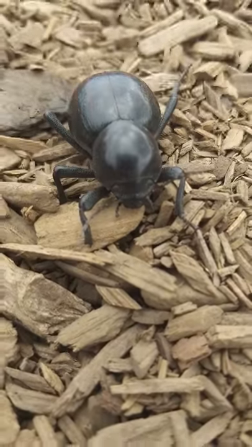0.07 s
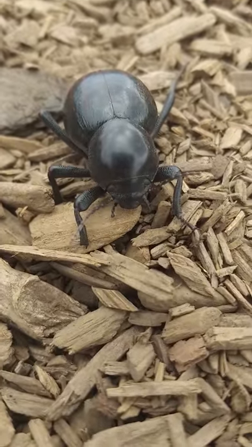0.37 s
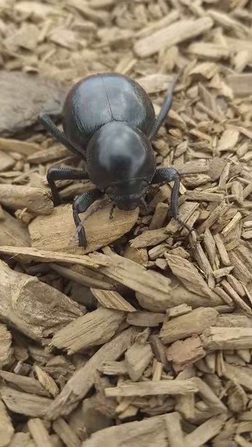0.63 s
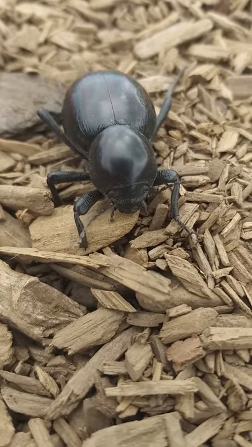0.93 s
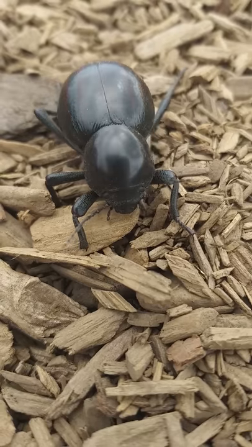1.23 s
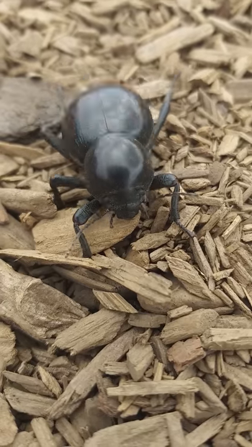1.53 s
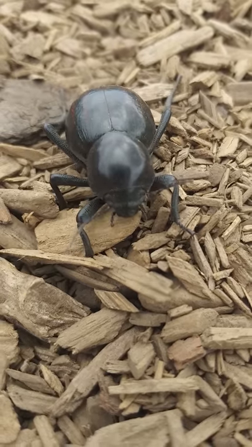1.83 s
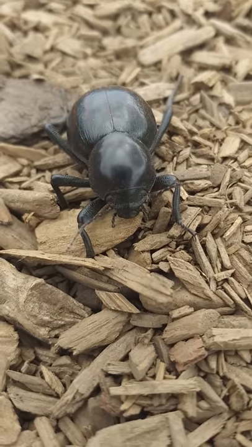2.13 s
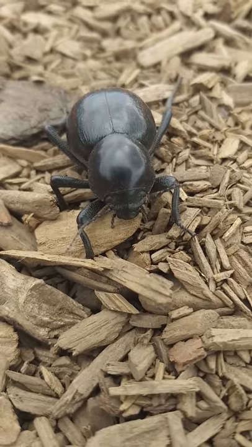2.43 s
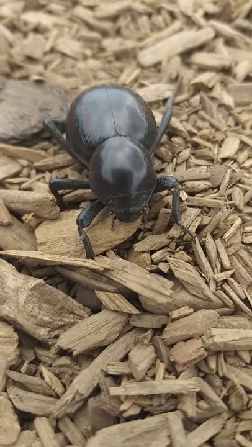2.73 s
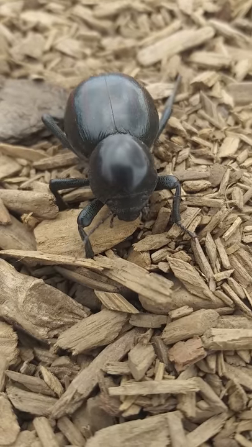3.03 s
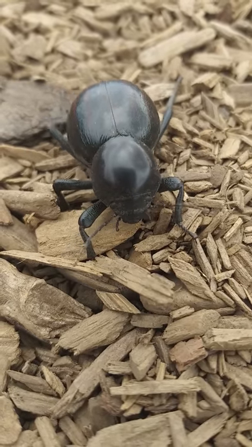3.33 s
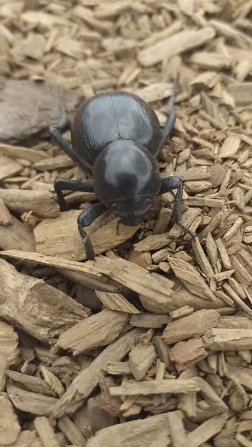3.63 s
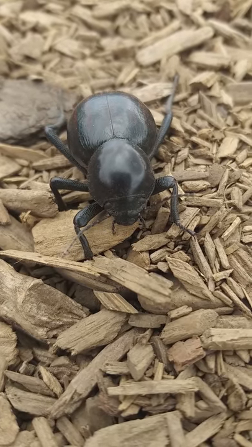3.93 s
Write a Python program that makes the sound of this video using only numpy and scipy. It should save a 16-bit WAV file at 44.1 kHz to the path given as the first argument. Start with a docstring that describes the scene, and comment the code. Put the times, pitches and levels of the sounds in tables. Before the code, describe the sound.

A beetle taps its body on wood chips close by, over a faint rumble and hiss. From about 1 to 1.8 seconds come five quick taps, each a hard click with a hollow knock, low thump and brief rustle. After a few faint ticks, the loudest tap lands at 3 seconds, followed by crackling chips. Three more quick taps come between 3.5 and 4 seconds.

```python
"""A beetle knocks its body on a bed of wood chips, close by: five taps, then four.
Each tap is a hard shell click, a hollow knock of the struck chip and a low thump of the bed;
the chips rustle and settle after it. Single chips tick and scrape under its legs,
over a quiet low rumble and hiss."""
import sys
import numpy as np
from scipy import signal
from scipy.fft import rfft, irfft, next_fast_len
from scipy.io import wavfile
from scipy.ndimage import map_coordinates

SR = 44100
rng = np.random.default_rng(int(sys.argv[2]) if len(sys.argv) > 2 else 0)


def digitize_waveform(pressure):
    """Quantize a signal to 16-bit integers and store it at the path in sys.argv[1].

    Rows of a 2-D input are taken as channels; values are limited to [-1, 1].
    """
    field = np.atleast_2d(pressure).T
    bounded = np.clip(field, -1, 1)
    quanta = np.round(bounded * 32767).astype(np.int16)
    wavfile.write(sys.argv[1], SR, quanta)


N = 176400

# Beetle taps. Each row: start in seconds, thump in dB and Hz, knock in dB and Hz, wood crack in dB,
# chip clack in dB, shell click in dB and Hz, high ping in dB and Hz, rustle in dB,
# rustle T60 in seconds, settling delay in seconds, settling in dB.
TAPS = [(1.0159, -34, 94, -40.5, 463, -59, -45, -37.5, 8350, -35.5, 15000, -50, 0.14, 0.046, -64.5),
        (1.2432, -23, 108.4, -28, 430, -53, -39.5, -37, 7800, -41.5, 12500, -45.5, 0.14, 0.059, -60.5),
        (1.4335, -22.5, 119.6, -44, 480, -53, -36.5, -33.5, 8180, -41, 14800, -49, 0.15, 0.061, -62.5),
        (1.6073, -26, 114.5, -31, 450, -46, -36, -33.5, 8560, -53, 10900, -52.5, 0.15, 0.059, -63),
        (1.7793, -28, 114, -34, 482, -54, -41, -35, 8400, -50, 15000, -52.5, 0.12, 0.046, -62.5),
        (3.0072, -22.5, 138.5, -24.5, 972, -21, -32, -21.5, 8430, -31, 11400, -36.5, .28, 0.082, -49),
        (3.5462, -28, 122, -30, 530, -33.5, -29.5, -26, 8400, -39, 12600, -44.5, .13, 0.068, -59),
        (3.7407, -23.5, 111, -25, 503, -51, -35.5, -28, 8860, -38.5, 11860, -49, 0.16, 0.068, -64.5),
        (3.9296, -21, 123.4, -36, 830, -45, -38.5, -33.5, 8570, -46, 11700, -44.5, 0.13, .059, -66)]
# Single chips snapping, and one second knock of the chip struck at 3.74 s (the 877 Hz row). Each row: start in
# seconds, level in dB, pitch in Hz, bandwidth in Hz.
TICKS = [(.9650, -55.5, 8900, 4000), (1.0272, -39, 8250, 3000), (1.0312, -42.5, 4400, 7040),
         (1.049, -41.5, 4400, 5000), (1.265, -35.5, 4000, 7000), (1.4120, -47.5, 6650, 8000),
         (1.4409, -27, 10500, 7100), (1.5716, -52, 8550, 5000), (1.63, -47, 3000, 7000),
         (1.8056, -42, 4600, 5000), (1.8230, -49.5, 4500, 9000), (2.165, -48.5, 14000, 6050),
         (2.221, -53, 14100, 6000), (2.3756, -40, 2700, 7700), (2.4576, -52, 8500, 8000),
         (3.0644, -35, 1900, 3500), (3.086, -31, 6960, 6000), (3.0911, -21.5, 3900, 8000),
         (3.0916, -20, 5200, 1700), (3.0944, -22, 2750, 6230), (3.1334, -39.5, 4500, 6000),
         (3.163, -43, 8000, 7000), (3.2019, -25.5, 3940, 14000), (3.2021, -25, 8575, 2770),
         (3.2435, -33.5, 3750, 5160), (3.2860, -41.5, 1850, 3020), (3.2945, -33.5, 5470, 1310),
         (3.313, -47.5, 2420, 4100), (3.3403, -53, 2870, 5000), (3.355, -47.5, 6000, 8000),
         (3.4431, -39.5, 4040, 5540), (3.4510, -47, 2500, 2960), (3.4757, -47, 9500, 4000),
         (3.5470, -25, 5030, 7140), (3.7422, -29, 877, 353), (3.7610, -41, 9100, 7000)]
# Legs and body scraping the chips. Each row: centre in seconds, half length in seconds, level in dB.
SCRAPES = [(0.15, 0.014, -74.5), (0.576, 0.0073, -72), (2.004, 0.017, -70), (3.258, 0.14, -71.5),
           (3.47, 0.057, -72.5), (3.5451, 0.0025, -34)]
# Chip resonances. Each row: frequency in Hz, bandwidth in Hz, gain per pass in dB.
WOOD_MODES = [(1330, 350, -8.5), (1770, 600, 1.5), (2500, 580, -1), (4500, 1000, -3.5)]
# Noise spectra of rumble, hiss, rubbing chips and bed. Each row: frequency in Hz, relative level in dB.
RUMBLE_SPECTRUM = [(20, -12), (40, -1.5), (65, -2), (95, 0.5), (130, -3.5), (175, -16.5), (260, -23),
                   (400, -32.5), (800, -51.5)]
HISS_SPECTRUM = [(150, -4), (400, -3), (800, -6.5), (1500, -9.5), (5000, -12.5), (10000, -14), (14000, -12),
                 (16000, -13.5)]
CHIP_SPECTRUM = [(100, 12.5), (600, 3), (1000, -1.5), (2000, 0.5), (3200, -3), (5000, 0), (6800, -2),
                 (8700, 1.5), (10300, -8.5), (14000, -6), (16000, -13.5)]
BED_SPECTRUM = [(40, -32), (85, -2.5), (140, -1.5), (250, -8), (500, -18.5), (800, -26.5), (1500, -55)]
# Stereo width of the hiss. Each row: frequency in Hz, side minus mid in dB.
HISS_SIDE = [(400, -16), (1800, -8), (4500, -3), (9000, -1)]
# Stereo balance of the beetle. Each row: frequency in Hz, left minus right in dB.
BALANCE = [(1100, 0), (1400, 2.8), (2100, 2.6), (2700, 0), (7000, 0), (8500, -.6), (15000, -.3)]


def amp(db):
    return 10 ** (np.asarray(db) / 20)


def along(points, hz):
    """Interpolate (Hz, value) points on a log axis."""
    point_hz, values = np.transpose(points)
    return np.interp(np.log(hz + 1), np.log(point_hz + 1), values)


def since(start_s):
    return np.arange(N) / SR - start_s


def bell(t, width_s):
    return np.exp(-np.minimum((t / width_s) ** 2, 200))


def fade(t, t60_s):
    return (t >= 0) * np.exp(-np.log(1000) * np.clip(t / t60_s, 0, 10))


def filtered(x, response):
    """Apply a complex response, given as a function of Hz."""
    n = x.shape[-1]
    padded = next_fast_len(n + n // 8)
    return irfft(rfft(x, padded) * response(np.fft.rfftfreq(padded, 1 / SR)), padded)[..., :n]


def ring(x, modes):
    """Two passes through (Hz, bandwidth, dB) resonances, for deep valleys."""
    def response(f):
        return sum((-1) ** k * amp(db) * 1j * f * width_hz / (hz * hz - f * f + 1j * f * width_hz)
                   for k, (hz, width_hz, db) in enumerate(modes))
    return filtered(filtered(x, response), response)


def coloured(x, spectrum):
    """Shape x to a spectrum, at rms 1."""
    x = filtered(x, lambda hz: amp(along(spectrum, hz)))
    return x / np.sqrt(np.mean(x ** 2) + 1e-20)


def add(track, start_s, x):
    part = track[round(start_s * SR):][:len(x)]
    part += x[:len(part)]


def rumble(level_db=-65, swing_db=1, waver_hz=10):
    """Low noise, wavering in level."""
    waver = map_coordinates(rng.standard_normal(64), [since(0) * waver_hz], mode="mirror")
    return amp(level_db + swing_db * waver) * coloured(rng.standard_normal(N), RUMBLE_SPECTRUM)


def hiss(mid_db=-77.5):
    """Faint steady noise, wider in the treble."""
    mid, side = coloured(rng.standard_normal((2, N)), HISS_SPECTRUM)
    side = filtered(side, lambda hz: amp(along(HISS_SIDE, hz)))
    return amp(mid_db) * np.array([mid + side, mid - side])


def chip_grains(envelope, grains_per_s=650, ref_db=-58.5, grain_share=0.61):
    """Chips rub in grains, at grains_per_s for a level of ref_db; a harder shake loosens more."""
    chance = np.clip(grains_per_s / SR * envelope / amp(ref_db), 1e-3, 1)
    grains = (rng.random(N) < chance) * rng.standard_normal(N) / np.sqrt(chance)
    rubbing = np.sqrt(grain_share) * grains + np.sqrt(1 - grain_share) * rng.standard_normal(N)
    return envelope * coloured(rubbing, CHIP_SPECTRUM)


def rustle(rise_s=0.0046, settle_rise_s=0.0064, settle_fall_s=0.014):
    """Scrapes and taps shake the chips. Taps add a low shudder; both swell again as the body lifts."""
    bed_re_thump_db, bed_re_settle_db, bed_t60_s = -21, -1.5, 0.14
    chip_power = sum((amp(db) * bell(since(centre_s), half_s)) ** 2 for centre_s, half_s, db in SCRAPES)
    bed_power = np.zeros(N)
    for start_s, thump_db, *_, rustle_db, t60_s, settle_s, settle_db in TAPS:
        t = since(start_s)
        rise = np.clip(t / rise_s, 0, 1)
        width_s = np.where(t < settle_s, settle_rise_s, settle_fall_s)
        settle = amp(settle_db) / np.cosh(np.minimum(abs(t - settle_s) / width_s, 20))
        shake = amp(rustle_db) * rise * fade(t, t60_s)
        shudder = amp(thump_db + bed_re_thump_db) * rise * fade(t, bed_t60_s)
        chip_power += shake ** 2 + settle ** 2
        bed_power += shudder ** 2 + (amp(bed_re_settle_db) * settle) ** 2
    chips = chip_grains(np.sqrt(chip_power))
    return chips + np.sqrt(bed_power) * coloured(rng.standard_normal(N), BED_SPECTRUM)


def chip_ticks(cutoff_ratio=1.52):
    """A chip slips, or a struck chip knocks a second time: a snap, splintering and faint scatter in the bed,
    through the chip's resonance."""
    out = np.zeros(N)
    t = np.arange(SR // 15) / SR
    splinter = 0.53 * fade(t, t60_s=0.002)
    scatter = amp(-39) * fade(t, t60_s=0.084)
    for start_s, db, hz, width_hz in TICKS:
        snap = (t == 0) + (splinter + scatter) * rng.standard_normal(len(t))
        tick = ring(snap, [(hz, width_hz, 0)])
        tick = filtered(tick, lambda f: 1 / (1 + (f / (cutoff_ratio * hz)) ** 4))
        add(out, start_s, 2 * amp(db) * tick / np.linalg.norm(tick))
    return out


def impact(t, rub, modes, roughness=0.17):
    """A snap and some rubbing ring the modes; energy equals 1/3 ms at rms 1."""
    x = ring((t == 0) + roughness * rub * rng.standard_normal(len(t)), modes)
    return x / np.linalg.norm(x) * np.sqrt(SR / 3000)


def shell_strikes(contact_s=0.0006, brush_s=0.0022, brush_db=-47.5):
    """The shell brushes, then hits a chip: wood cracks and clacks; where it lands sets the shell pitch."""
    clack_hz, clack_width_hz, shell_width_hz, ping_width_hz = 5950, 4000, 1500, 1200
    out = np.zeros(N)
    t = np.arange(-SR // 100, SR // 50) / SR
    for start_s, _, _, _, _, crack_db, clack_db, shell_db, shell_hz, ping_db, ping_hz, *_ in TAPS:
        rub = bell(t - contact_s / 2, contact_s) + amp(brush_db - shell_db) * bell(t, brush_s)
        hit = amp(crack_db) * impact(t, fade(t, t60_s=0.0011), WOOD_MODES)
        hit += amp(clack_db) * impact(t, rub, [(clack_hz, clack_width_hz, 0)])
        hit += amp(shell_db) * impact(t, rub, [(shell_hz, shell_width_hz, 0)])
        hit += amp(ping_db) * impact(t, rub, [(ping_hz, ping_width_hz, 0)])
        add(out, start_s + t[0], hit)
    return out


def thumps_and_knocks(thump_peak_s=0.0081, sag_s=0.0016, knock_delay_s=0.00091):
    """The bed is pushed down and bounces for a few slowing cycles; the struck chip knocks."""
    out = np.zeros(N)
    t = np.arange(SR // 20) / SR
    pitch_ratio = 1 + 3.11 * np.exp(-t / sag_s)  # the bed is stiffer while pressed
    thump_envelope = bell(t - thump_peak_s, width_s=0.006)
    knock_t = np.maximum(t - knock_delay_s, 0)
    knock_envelope = fade(knock_t, t60_s=0.017) * (1 - bell(knock_t, width_s=0.00044))
    for start_s, thump_db, thump_hz, knock_db, knock_hz, *_ in TAPS:
        thump = np.sin(2 * np.pi * np.cumsum(thump_hz * pitch_ratio) / SR) * thump_envelope
        knock = np.sin(2 * np.pi * knock_hz * knock_t) * knock_envelope
        add(out, start_s, -amp(thump_db) * thump - amp(knock_db) * knock)
    return out


def scene():
    """The beetle, near centre, over rumble and hiss."""
    beetle = shell_strikes() + thumps_and_knocks() + rustle() + chip_ticks()
    stereo = filtered(beetle, lambda hz: amp(np.outer([0.5, -0.5], along(BALANCE, hz))))
    return stereo + rumble() + hiss()


def record(dry):
    """Low cut and a steep treble limit."""
    low_cut_hz, top_hz, edge_hz = 99.5, 16000, 400
    thinned = signal.sosfilt(signal.butter(2, low_cut_hz, "highpass", fs=SR, output="sos"), dry)
    return filtered(thinned, lambda hz: np.clip((top_hz - hz) / edge_hz + 0.5, 0, 1))


dry = scene()
out = record(dry)
digitize_waveform(out)
```